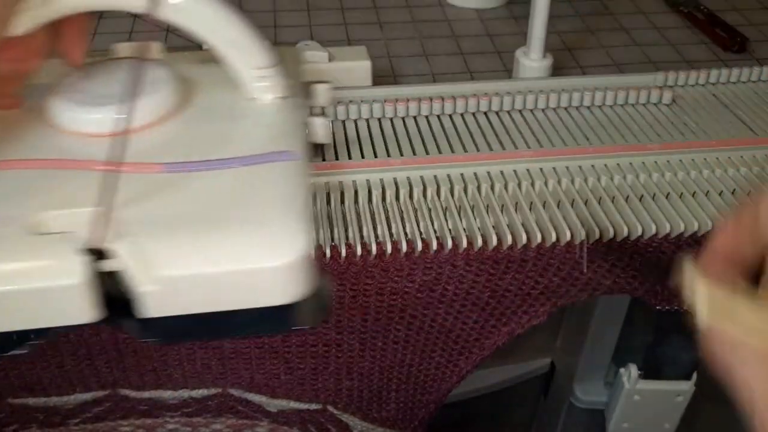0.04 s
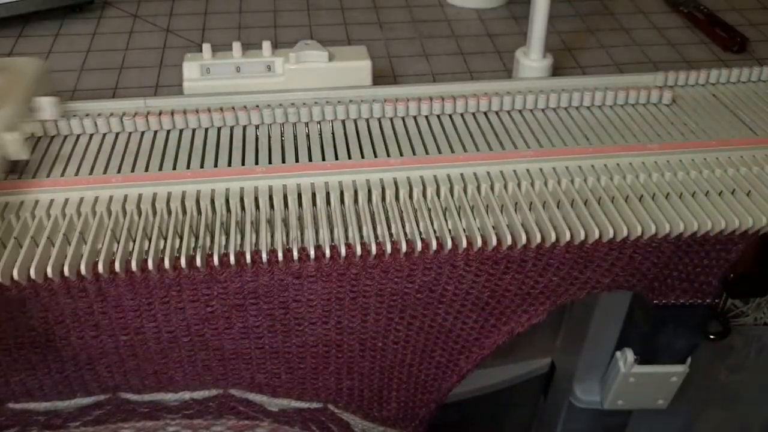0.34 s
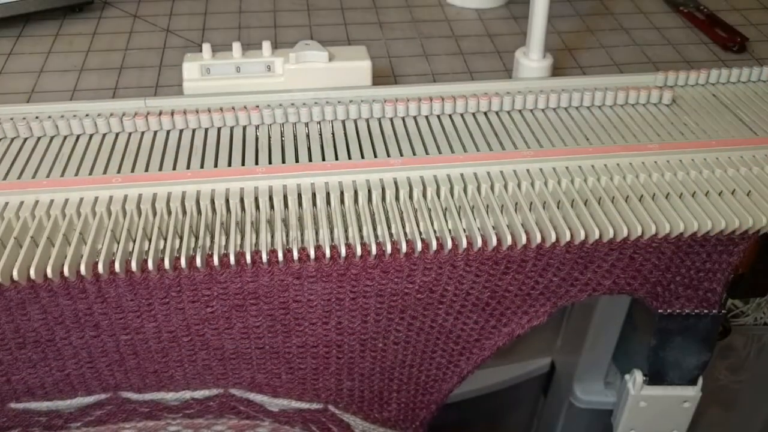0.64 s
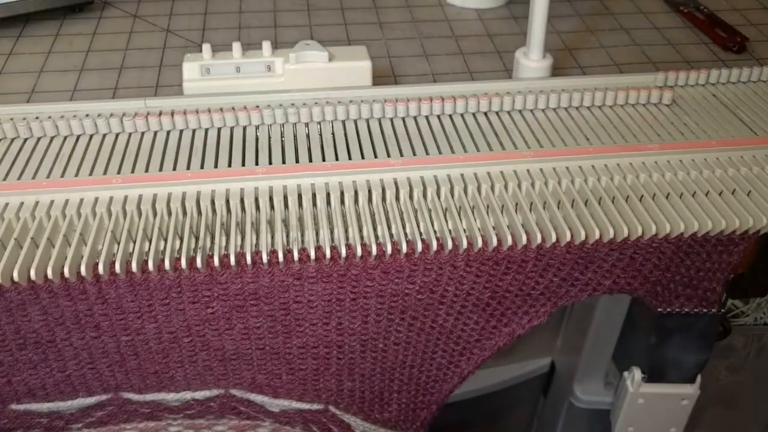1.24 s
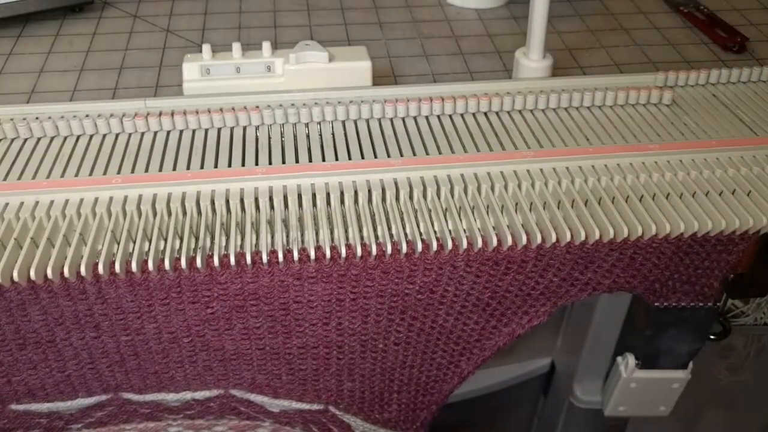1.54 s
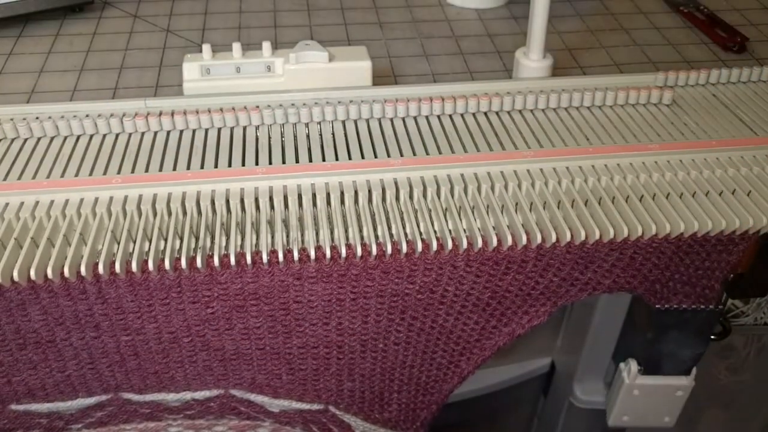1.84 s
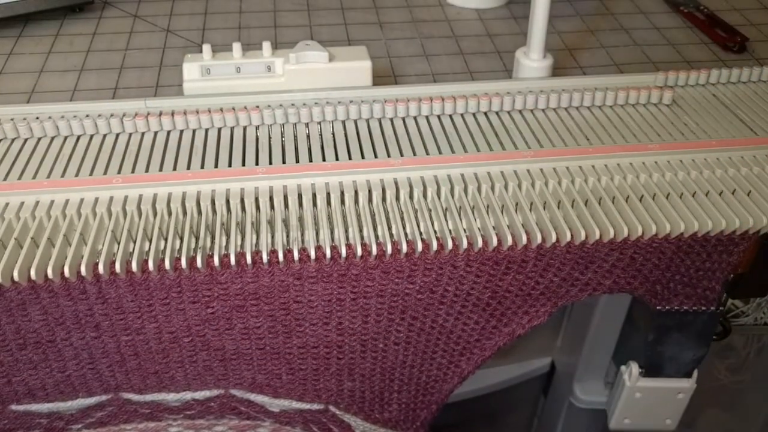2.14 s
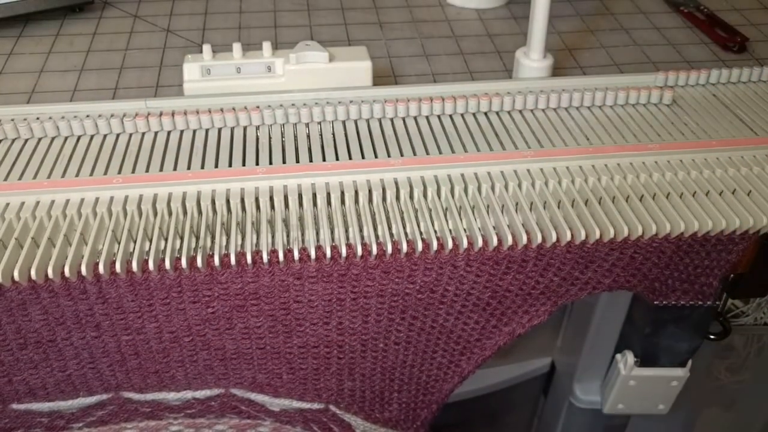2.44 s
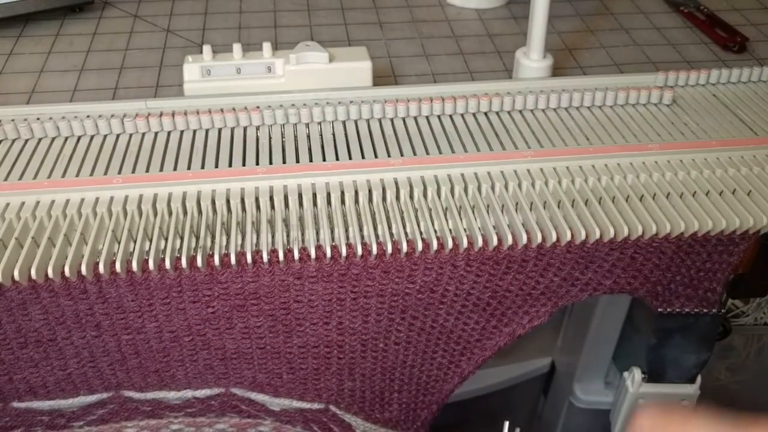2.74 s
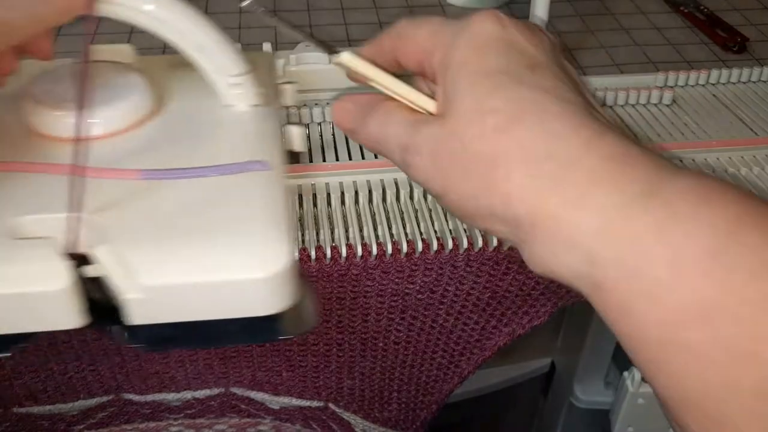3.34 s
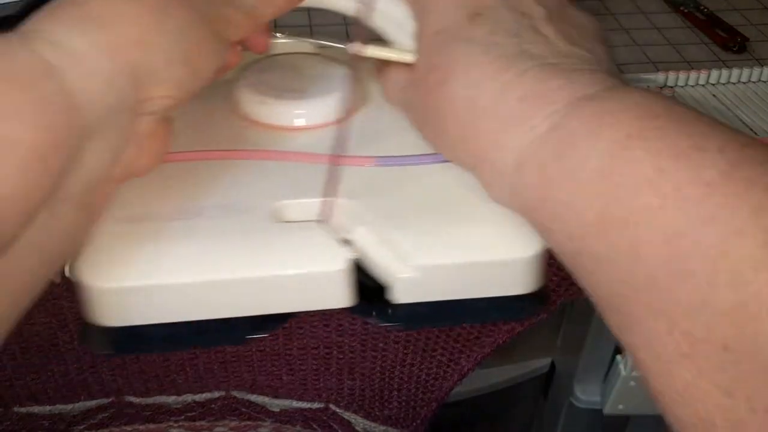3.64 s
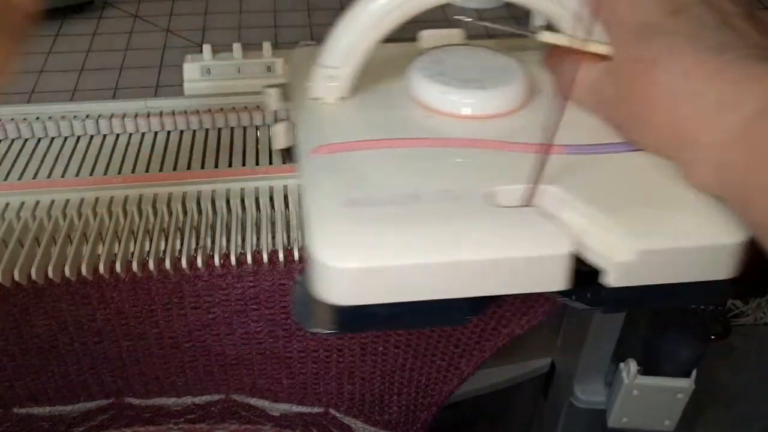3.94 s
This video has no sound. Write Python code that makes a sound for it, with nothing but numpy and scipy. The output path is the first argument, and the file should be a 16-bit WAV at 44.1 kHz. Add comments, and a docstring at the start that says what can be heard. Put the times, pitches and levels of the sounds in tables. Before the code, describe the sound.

Loud ratcheting clatter of a knitting machine carriage, stopping briefly with a clack before rattling back.

```python
"""In a small room, the carriage of a plastic knitting machine is pushed along. Its cams (ramps inside it)
hit the steel needles in turn: they chatter, single ones snap loudly, the plastic needle bed and hollow
carriage shell resound, and the table rumbles. The carriage slows and bumps to rest at about 1.4 s.
After a short lull it is drawn back from about 1.9 s, rattling and snapping again,
and near the end it clacks several times against its rail."""
import sys
import numpy as np
from scipy import signal
from scipy.fft import rfft, irfft, next_fast_len
from scipy.io import wavfile
from scipy.ndimage import map_coordinates

SR = 44100
rng = np.random.default_rng(int(sys.argv[2]) if len(sys.argv) > 2 else 0)


def generate_wav(signal):
    """Clip the signal to [-1, 1] and save it as 16-bit WAV at the path in sys.argv[1]."""
    frames = np.transpose(np.atleast_2d(signal))
    scaled = np.clip(frames, -1, 1) * 32767
    pcm = np.round(scaled).astype(np.int16)
    wavfile.write(sys.argv[1], SR, pcm)


N = 176400
TIME = np.arange(N) / SR


def amp(db):
    """Turn decibels into a number to multiply by."""
    return 10 ** (np.asarray(db) / 20)


def unit(x):
    """Scale a sound to an average (rms) level of 1."""
    return x / np.sqrt(np.mean(x ** 2) + 1e-20)


def along(points, hz):
    """Read between (f/Hz, value) points, giving each octave equal space."""
    f, values = np.transpose(points)
    return np.interp(np.log(hz + 1), np.log(f + 1), values)


def curves(rows):
    """Join timed rows into one curve for each column after the time."""
    times, *columns = np.transpose(rows)
    return [np.interp(TIME, times, column) for column in columns]


def colour(x, points, shift=1):
    """Filter a sound through (f/Hz, level/dB) points; only their shape counts, not their overall level."""
    size = 8192
    cepstrum = irfft(np.log(amp(along(points, np.fft.rfftfreq(size, 1 / SR) / shift))))
    cepstrum[1:size // 2] *= 2  # folded so the filter rings after a hit, never before
    cepstrum[size // 2 + 1:] = 0
    response = irfft(np.exp(rfft(cepstrum)))
    return signal.fftconvolve(x, response / np.linalg.norm(response))[:N]


def bursts(times, gains, t60):
    """A puff of noise for each hit; t60 is its fade time, the seconds it takes to drop 60 dB."""
    starts = np.round(np.abs(times) * SR).astype(int)
    hits = np.bincount(starts, np.square(gains), N)[:N]
    power = signal.lfilter([1], [1, -amp(-120 / (t60 * SR))], hits)
    return np.sqrt(np.abs(power)) * rng.standard_normal(N)


def rattle(rate, scatter_db, t60):
    """Tiny hits of uneven strength at random moments, rate of them a second."""
    moments = rng.random((12000, 2))[:, 0] * N / SR
    size_db = scatter_db * rng.standard_normal(len(moments)).clip(-2, 2)
    count = int(rate * N / SR)
    return unit(bursts(moments[:count], amp(size_db[:count]), t60))


def ring(times, gains, tones, detune, tuning=None):
    """Each hit rings with a set of fading tones, a little different every time."""
    t, out = np.arange(SR // 20) / SR, np.zeros(N + SR)
    hz, db, t60 = np.transpose(tones)
    fade = amp(db[:, None] - 60 * t / t60[:, None])
    chance = rng.standard_normal((512, 3, len(hz), 1))
    for start, gain, (mistune, size, phase) in zip(times, gains, chance):
        ratio = 1 if tuning is None else np.interp(start, *np.transpose(tuning))
        waves = np.sin(2 * np.pi * (hz[:, None] * (ratio + detune * mistune) * t + phase))
        out[int(abs(start) * SR):][:len(t)] += gain * np.sum(fade * amp(2 * size) * waves, axis=0)
    return out[:N]


# tone colour of the quiet room: f/Hz, level/dB
HUSH_COLOUR = [(25, -12), (70, 9.5), (130, 3.5), (300, -1.5), (800, -5), (2000, -8.5), (3400, -8),
               (5000, -40), (9000, -7.5), (15700, -17)]
def room_hush():
    """A faint, steady, deep noise lies under everything."""
    return amp(-55.5) * colour(rng.standard_normal(N), HUSH_COLOUR)


# how long the echo lasts, from low notes to high: f/Hz, fade time/s
ECHO_FADE = [(150, 0.31), (2000, 0.071), (6000, 0.13), (15000, 0.11)]
def room_echo(x):
    """A short room echo, longest in the bass, slowly varied so no steady tones ring."""
    out, count = np.zeros(N), 13
    for k in range(count):
        hz, t, spectrum = signal.stft(rng.standard_normal(SR // 2), SR, nperseg=256)
        fade = amp(-60 * t / along(ECHO_FADE, hz)[:, None])
        tail = signal.istft(spectrum * fade, SR, nperseg=256)[1]
        echo = np.pad(tail, (SR // 250, 0)) / np.linalg.norm(tail)  # arrives 4 ms late
        share = np.sqrt(np.clip(1 - abs(np.arange(N) * (count - 1) / N - k), 0, 1))
        out += signal.fftconvolve(x * share, echo)[:N]  # each echo blends into the next
    return out


# narrow tones that swell and fade: t/s, half length/s, f/Hz, width/Hz, level/dB
RESONANCES = [(0.0, .06, 1310, 150, -33), (.3, .25, 11090, 120, -38), (.4, .25, 7990, 220, -35),
              (.53, .11, 3210, 260, -29.5), (.58, .07, 12980, 260, -37), (.86, .12, 12170, 180, -41),
              (.95, .08, 11100, 90, -42), (1.0, .07, 2270, 90, -40), (1.7, .2, 3420, 160, -64),
              (2.25, .08, 2230, 130, -36.5), (2.34, .025, 3290, 120, -36), (2.64, .1, 3310, 220, -41),
              (3.0, .25, 6300, 300, -39), (3.05, .35, 1790, 170, -39), (3.55, .35, 11090, 130, -39.5),
              (3.73, .14, 1270, 160, -31)]
def resonances():
    """The rattle stirs up narrow tones: low from bed and shell, high from singing needles and latches."""
    out = np.zeros(N)
    contacts = rattle(rate=800, scatter_db=2, t60=.02)
    for middle, half, hz, width, db in RESONANCES:
        b, a = signal.iirpeak(hz, hz / (1.5 * width), SR)
        band = signal.lfilter(b, a, signal.lfilter(b, a, contacts))
        swell = np.exp(-.5 * ((TIME - middle) / half) ** 2)
        out += amp(db) * swell * unit(band)
    return out


# blows to the frame: t/s, level/dB, fade time/s, pitch/ratio
FRAME_BUMPS = [(1.276, -17, 0.043, 0.96), (1.305, -32.5, 0.054, 0.35), (1.535, -43, 0.062, 0.72),
               (2.35, -30, 0.069, 0.37), (3.386, -20.5, 0.037, 1.104), (3.846, -24.5, .04, 1.3)]
# tone colour of the frame: f/Hz, level/dB
FRAME_COLOUR = [(150, -13), (340, -9), (478, 3), (530, -9), (595, 4), (720, -11), (818, 4.5), (890, -8),
                (980, 10), (1050, 2), (1170, -10), (1390, -9), (1600, -17), (3000, -20)]
# shudders of the table: t/s, level/dB
TABLE_THUDS = [(0.024, -34), (.245, -37), (1.3, -47), (2.03, -45), (2.29, -53)]
def bumps():
    """Dull blows ring the frame and shake the table."""
    frame = sum(colour(bursts([t], [amp(db)], t60), FRAME_COLOUR, pitch)
                for t, db, t60, pitch in FRAME_BUMPS)
    times, thud_db = np.transpose(TABLE_THUDS)
    boom = [(25, -35), (40, -19), (55, 0.5), (72, -7), (130, -12), (400, -25), (1500, -70)]
    return frame + colour(bursts(times, amp(thud_db), t60=.15), boom)


# knocks on the rail: t/s, relative level/dB, fade time/s
RAIL_CLACKS = [(1.4052, -24, 0.04), (1.64, -51.5, 0.017), (1.7302, -31.5, 0.016), (1.908, -50, .025),
               (1.9365, -34.5, .02), (1.9403, -25, 0.014), (2.0252, -32, 0.045), (3.384, -27, .04),
               (3.796, -27.5, 0.033), (3.8407, -21, 0.05), (3.8453, -33, 0.032), (3.885, -28, 0.071),
               (3.932, -27, 0.052)]
# tone colour of those knocks: f/Hz, level/dB
RAIL_COLOUR = [(120, -66), (200, -59), (536, -8), (846, -2), (1260, 0.5), (2190, 4.5), (3990, 3), (5550, 2),
               (6300, 4), (8140, -1.5), (9590, 2.5), (10900, -10), (11500, 0), (13100, -3), (15700, -13)]
def clacks():
    """The carriage knocks on its rail as it stops, starts and rides over the stitches."""
    hits = np.zeros(N)
    for t, db, t60 in RAIL_CLACKS:
        body = bursts([t], [amp(db)], t60)
        edge = bursts([t], [amp(db)], t60=.013)
        tail = bursts([t], [amp(db - 33)], t60=.11)
        hits += body + edge + tail
    return amp(8.5) * colour(hits, RAIL_COLOUR)


# tone colour of the plastic bed: f/Hz, level/dB
BED_COLOUR = [(900, -35.5), (1550, 0), (1780, 3.5), (2250, 1.5), (2650, -0.5), (3200, 2), (3900, -2),
              (4600, 0.5), (6500, -37)]
def plastic_bed(hits):
    """The bed that holds the needles gives hits a plastic sound."""
    return colour(hits, BED_COLOUR)


# tone colour of a struck needle: f/Hz, level/dB
CRACK_COLOUR = [(1500, -22), (3200, -11), (5000, -3), (6400, 3.5), (7800, 1), (9500, -1), (11200, 1.5),
                (12600, 3), (13800, 0), (14800, 4), (15700, -3.5)]
def needle_crack(hits):
    """A hit on a steel needle makes a bright crack."""
    return colour(hits, CRACK_COLOUR)


# tones of a needle's stem: f/Hz, level/dB, fade time/s
STEM_TONES = [(6280, -11, .016), (8980, -5, .016), (9250, -2, .018), (9480, 0, .021), (9720, -4, .016),
              (14500, -13, .018)]
# how the stems' pitch drifts along the bed: t/s, pitch/ratio
STEM_DRIFT = [(.15, 1.0), (.45, 1.015), (1.1, .975), (1.37, 1.0), (2.7, .99), (3.5, 1.02)]
def stem_ring(times, gains, detune):
    """The thin steel stem of a struck needle rings high and briefly."""
    return ring(times, gains, STEM_TONES, detune, STEM_DRIFT)


# loud snaps: t/s, then relative level/dB of the crack, the plastic, the stem and the latch
NEEDLE_SNAPS = [(0.03, -14, -28, -28, -29), (0.098, -19, -31, -31, -20), (0.143, -22, -34, -19, -25),
                (0.161, -18, -30, -15, -32), (0.188, -23, -22, -15, -42), (0.229, -14, -33, -17, -20),
                (0.2562, -24, -23, -17, -22), (0.4543, -26, -28, -13.5, -18), (0.657, -31, -39, -25, -25),
                (0.7357, -26, -35, -31, -38), (0.7635, -30, -43, -46, -22), (0.7806, -21, -24.5, -33, -28),
                (0.8098, -16, -28, -36, -33), (0.8769, -19, -23.5, -36, -47),
                (0.8874, -25, -24.5, -36, -29), (0.9065, -24, -36, -31, -51),
                (0.9184, -20, -25.5, -50, -26), (0.9453, -25, -31, -25, -23), (0.959, -33, -28, -28, -39),
                (0.969, -17.5, -38, -34, -23), (0.9833, -17, -25, -38, -40), (0.9962, -27, -34, -26, -18),
                (1.019, -33, -24, -35, -24), (1.039, -21, -27, -28, -41), (1.055, -30, -45, -51, -37),
                (1.0664, -33, -32, -56, -57), (1.077, -34, -37, -40, -43), (1.095, -19.5, -31, -30, -37),
                (1.1517, -34, -37, -32, -51), (1.1668, -24, -22, -24, -28), (1.204, -29, -31, -34, -59),
                (1.2179, -18.5, -27.5, -30, -22), (1.2323, -21, -22.5, -41, -32),
                (1.249, -23, -20, -25, -27), (1.262, -21, -27, -30, -31), (1.371, -31, -30, -27, -48),
                (1.378, -35, -32, -34, -46), (1.39, -33, -29, -54, -51), (1.399, -24, -34, -28, -40),
                (1.929, -17, -32, -29, -28), (1.9743, -23, -40, -45, -30), (2.0816, -23, -29, -26, -44),
                (2.104, -22, -32, -35, -37), (2.115, -30, -33, -26, -35), (2.129, -20, -27.5, -20, -35),
                (2.14, -18, -28, -45, -43), (2.149, -25, -23.5, -44, -39), (2.168, -19, -24.5, -31, -31),
                (2.1912, -17, -37, -29, -35), (2.23, -19, -25.5, -26, -39), (2.262, -21, -25, -27, -22),
                (2.374, -22, -29, -25, -37), (2.4458, -29, -26, -28, -41), (2.4792, -24, -32, -23, -21),
                (2.5133, -14, -28, -27, -28), (2.5608, -20, -38, -18.5, -21), (2.583, -25, -29, -22, -30),
                (2.6645, -22, -24, -19.5, -24), (2.6865, -25, -27, -27, -41), (2.711, -26, -34, -18, -20),
                (2.7334, -25, -24, -32, -41), (2.76, -20, -38, -22, -25), (2.7853, -14.5, -25, -28, -30),
                (2.809, -21, -33, -21.5, -26), (2.9032, -14, -39, -32, -37), (2.93, -20, -37, -31, -41),
                (2.9955, -17, -31, -21, -23), (3.0608, -16, -27, -34, -34), (3.1505, -15, -20.5, -30, -28),
                (3.1704, -18, -36, -30, -24), (3.207, -22, -42, -43, -35), (3.367, -19, -30, -35, -20),
                (3.4468, -18, -25, -25, -31), (3.467, -24, -38, -24, -33), (3.4876, -24, -34, -21.5, -24),
                (3.5078, -21, -23, -20, -28), (3.5475, -14, -25, -21, -37), (3.5675, -16, -37, -16, -27),
                (3.586, -17, -37, -16, -30), (3.607, -28, -32, -18.5, -48), (3.6265, -21, -20, -22, -36),
                (3.647, -19, -27, -22, -39), (3.667, -29, -30, -29, -37), (3.6871, -14, -30, -26, -32),
                (3.71, -17, -26, -34, -48), (3.731, -17, -32, -28, -38), (3.857, -11, -37, -40, -20),
                (3.912, -24, -35, -28, -23)]
# tones of the latch, the tiny flap on a needle's hook: f/Hz, level/dB, fade time/s
LATCH_TONES = [(11100, -3, .036), (12170, -3, .028), (12500, -5, .015), (12950, -4, .02)]
# tones of the slot a needle slides in: f/Hz, level/dB, fade time/s
SLOT_TONES = [(1880, -8, .025), (2260, 0, .045), (3250, -6, .025), (4900, -4, .028)]
def snaps():
    """A needle catches on a cam and springs free: it cracks, rings, and knocks and pings in its slot."""
    times, crack_db, plastic_db, stem_db, latch_db = np.transpose(NEEDLE_SNAPS)
    release = bursts(times, amp(crack_db), t60=.014)
    catch = bursts(times - .0027, amp(crack_db - 11.5), t60=.014)  # a soft touch just before
    stem = stem_ring(times, amp(stem_db), detune=.007)
    latch = ring(times, amp(latch_db), LATCH_TONES, detune=.003)
    knock = plastic_bed(bursts(times, amp(plastic_db - 6.5), t60=.029))
    ping = ring(times, amp(plastic_db - 5.5), SLOT_TONES, detune=.015)
    return needle_crack(catch + release) + stem + latch + knock + ping


def needle_ticks(needles_passed):
    """The cams tick against each needle they reach, a little uneven in timing and strength."""
    times = np.flatnonzero(np.diff(np.floor(needles_passed))) / SR
    late, size = rng.standard_normal((2, 512))[:, :len(times)]
    times = times + .0007 * late
    gains = amp(1.5 * size.clip(-2, 1.5))
    cracks = unit(needle_crack(bursts(times, gains, t60=.011)))
    stems = unit(stem_ring(times, gains, detune=.008))
    return unit(cracks + amp(-1.5) * stems)


TURN_S = 1.66  # the hand changes from pushing to pulling
# tone colour of the chatter on the push and on the pull: f/Hz, level/dB
PUSH_CHATTER = [(2060, -7), (3500, -4.5), (4420, -9), (4980, -1), (5400, -3.5), (6440, 0), (7030, -4),
                (7820, 0), (8650, 0.5), (9500, -3.5), (10500, -3), (11300, -5), (12100, -3), (12900, -7),
                (13800, -9.5), (15100, -5), (15700, -14)]
PULL_CHATTER = [(2060, -61), (3500, -5.5), (5300, 2), (6320, 6), (7770, 2), (9620, 3), (10500, 1),
                (11500, 0), (12100, -4), (14800, 0.5), (15700, -3.5)]
def needle_chatter(surge):
    """Needles and latches chatter in their slots, a little differently in each direction."""
    contacts = surge * rattle(rate=1400, scatter_db=2.5, t60=.009)
    weak_lows = [(2000, -30)]
    pushed = colour(contacts, weak_lows + list(PUSH_CHATTER))
    pulled = colour(contacts, weak_lows + list(PULL_CHATTER))
    return np.where(TIME > TURN_S, pulled, pushed)


# how fast the carriage moves: t/s, speed/(needles per second)
CARRIAGE_SPEED = [(0, 70), (.25, 76), (.5, 78.5), (.8, 65.5), (1.0, 44), (1.12, 14), (1.28, 55.5),
                  (1.4, -0.5), (1.9, 0), (2.1, 42), (2.3, 60), (2.45, 30), (2.7, 43.5), (3.15, 45.5),
                  (3.55, 51.5), (4, 44)]
# the push and the pull: t/s, then relative level/dB of the needles, the bed, the shell and the table
PUSH_LEVELS = [(0.0, -22, -27, -19.5, -37.5), (0.05, -24, -27.5, -37, -44.0),
               (0.2, -22, -28.5, -31.5, -42.5), (0.37, -23.5, -30.5, -38, -42), (0.45, -21, -25, -44, -40),
               (0.63, -22, -29.5, -42, -43), (0.71, -29, -35.5, -44, -45.5), (0.82, -26.5, -29, -54, -41),
               (0.9, -36.5, -37.5, -49, -47), (1.0, -34.5, -39.5, -52, -50), (1.13, -58, -49.5, -73, -50.5),
               (1.2, -42.5, -47, -46, -49.5), (1.28, -29, -30.5, -35, -35), (1.35, -52, -41.5, -44, -45.5),
               (1.44, -44, -38.5, -47, -54.5), (1.5, -53.5, -48.5, -60, -58), (1.6, -51.5, -52, -57, -62)]
PULL_LEVELS = [(1.83, -52.5, -51, -63.5, -67), (1.9, -53, -45, -55, -46.5), (1.96, -40, -35, -38, -45),
               (2.02, -35, -39, -52, -45), (2.07, -52, -43.5, -45, -50), (2.2, -35, -39, -45, -47),
               (2.26, -24.5, -31.5, -45, -43), (2.34, -26, -29, -37, -48), (2.41, -36.5, -38, -44.5, -45.5),
               (2.6, -26.5, -30, -43, -43.5), (2.8, -29, -31.5, -41.5, -46.5), (3.1, -26, -30, -38.5, -45),
               (3.26, -22.5, -26.5, -32.5, -44.5), (3.45, -28, -30, -33, -46.5),
               (3.77, -29, -28, -27, -45.0), (3.87, -36, -33.5, -29.5, -50.5),
               (3.95, -24.5, -23.5, -36.5, -41.5), (4.0, -27, -28, -40, -61)]
# tone colours of the hollow carriage shell and of the table: f/Hz, level/dB
SHELL_COLOUR = [(700, -32), (1020, -22), (1150, -3), (1300, 0), (1460, -5), (1620, -7), (2200, -22)]
TABLE_COLOUR = [(25, -7), (45, -28.5), (70, 2.5), (100, -3), (180, -2), (250, -1), (350, 4), (480, -0.5),
                (700, 0), (950, 2), (1300, 0), (2500, -69)]
def carriage():
    """The sliding carriage strikes needle after needle while the bed, its shell and the table resound."""
    speed, = curves(CARRIAGE_SPEED)
    lull = [(TURN_S, -66, -66, -70, -70)]
    needle_db, bed_db, shell_db, table_db = curves(list(PUSH_LEVELS) + lull + list(PULL_LEVELS))
    needles_passed = np.cumsum(np.abs(speed)) / SR
    surge = unit(amp(0.5 * np.cos(2 * np.pi * needles_passed - 1)))  # a slight swell for each needle
    needles = amp(-10) * needle_ticks(needles_passed) + amp(-0.5) * needle_chatter(surge)
    bed = plastic_bed(surge * rattle(rate=650, scatter_db=1.5, t60=.043))
    shell = colour(rattle(rate=700, scatter_db=2, t60=.025), SHELL_COLOUR)
    table = colour(rattle(rate=300, scatter_db=5, t60=.13), TABLE_COLOUR)
    return (amp(needle_db) * needles + amp(bed_db - 2) * bed
            + amp(shell_db - 2.5) * shell + amp(table_db + 2) * table)


def scene():
    """The machine, its echo and the hush of the room, in one channel."""
    machine = carriage() + snaps() + clacks() + bumps()
    hush = room_hush()
    return (machine + amp(-9.5) * room_echo(machine) + hush)[None]


def record(dry):
    """Cut away the very highest treble, above 15800 Hz."""
    size = next_fast_len(N + SR // 2)
    kept = np.fft.rfftfreq(size, 1 / SR) < 15800
    return irfft(rfft(dry, size) * kept, size)[..., :N]


dry = scene()
out = record(dry)
generate_wav(out)
```